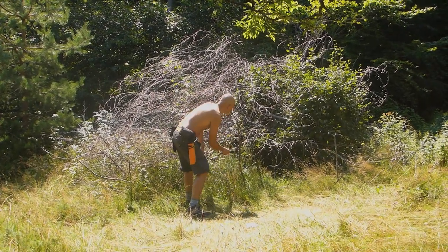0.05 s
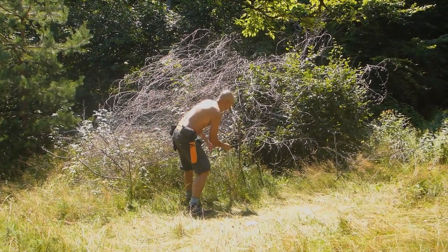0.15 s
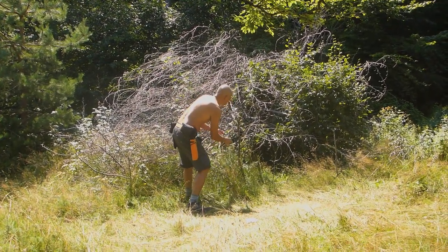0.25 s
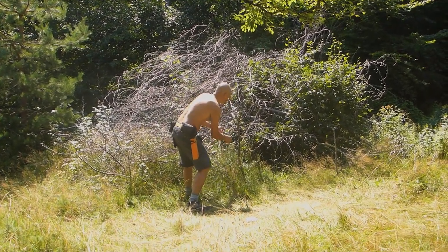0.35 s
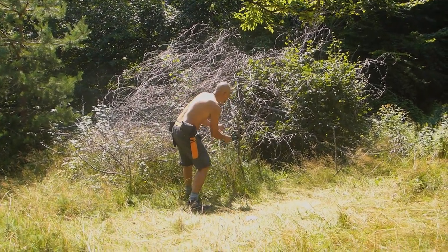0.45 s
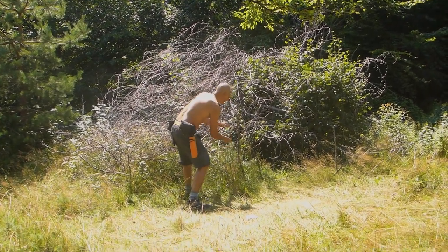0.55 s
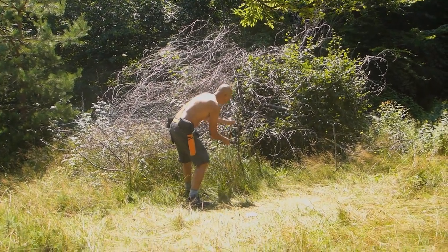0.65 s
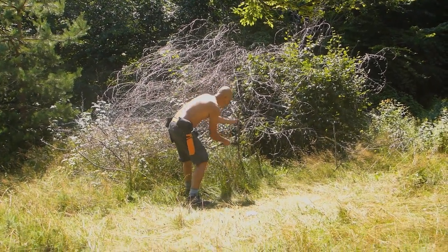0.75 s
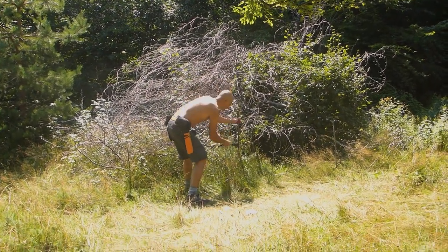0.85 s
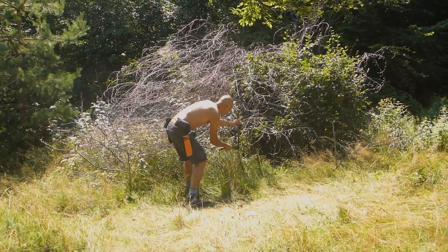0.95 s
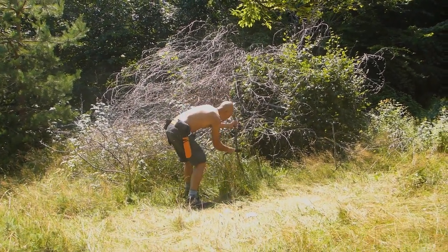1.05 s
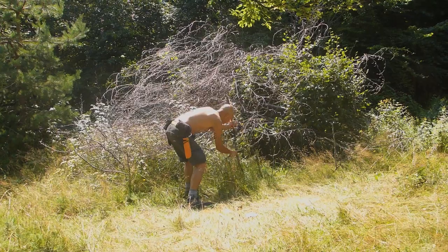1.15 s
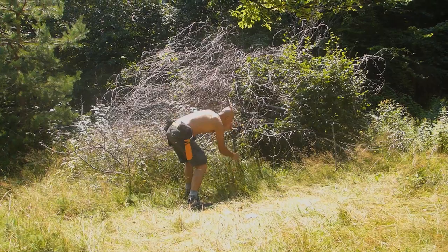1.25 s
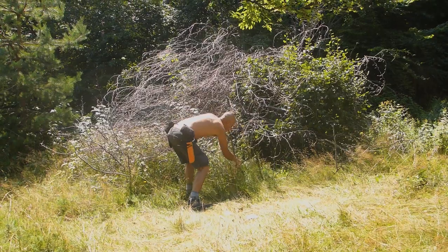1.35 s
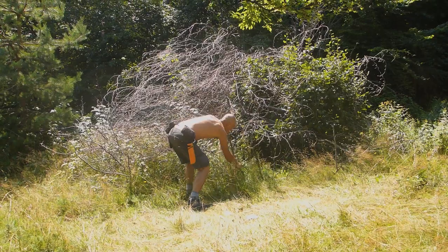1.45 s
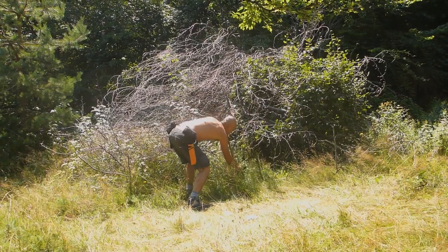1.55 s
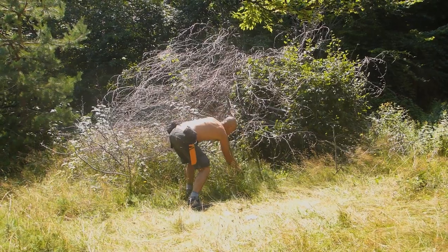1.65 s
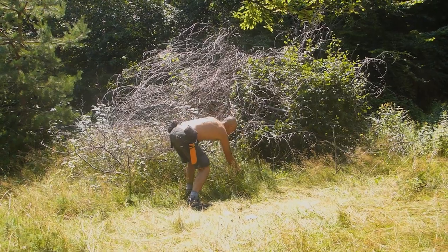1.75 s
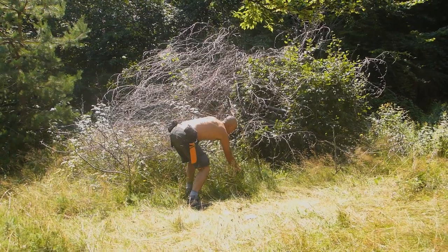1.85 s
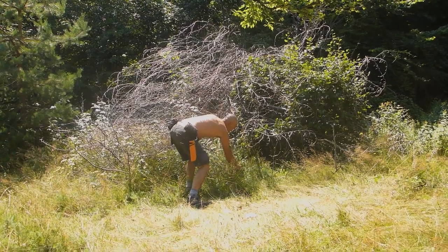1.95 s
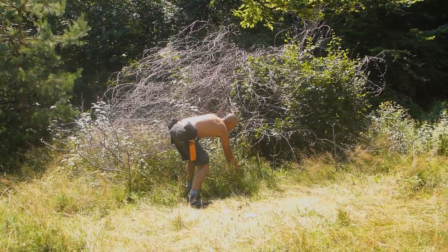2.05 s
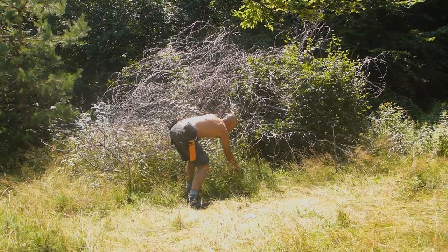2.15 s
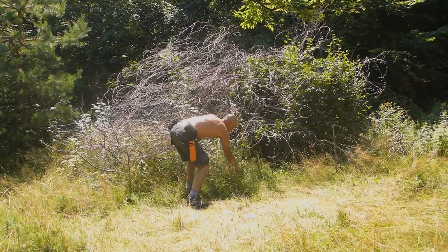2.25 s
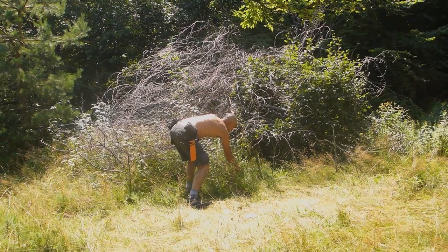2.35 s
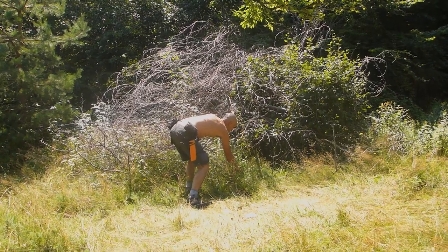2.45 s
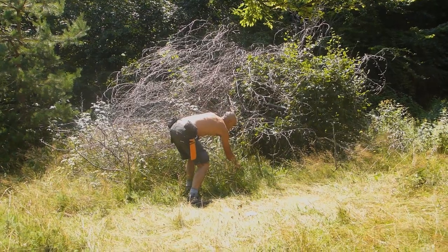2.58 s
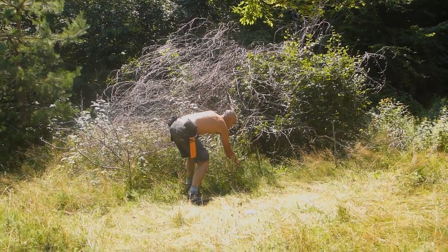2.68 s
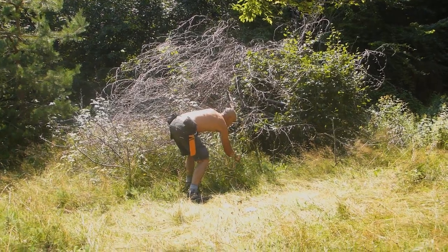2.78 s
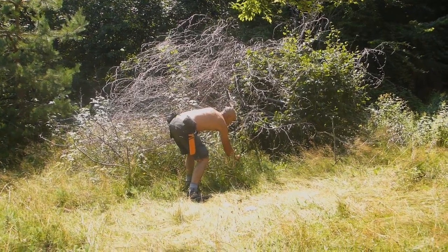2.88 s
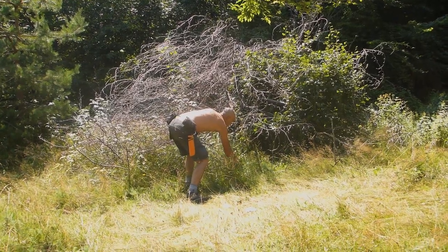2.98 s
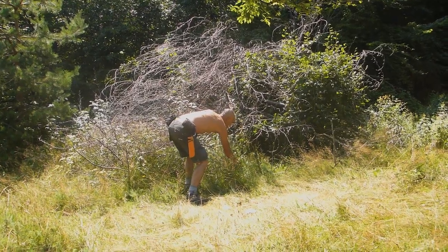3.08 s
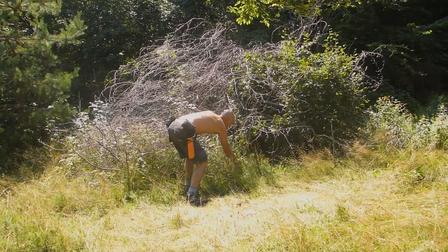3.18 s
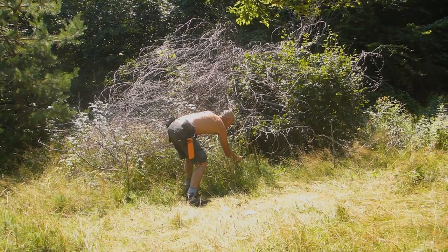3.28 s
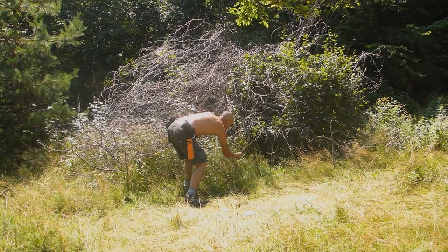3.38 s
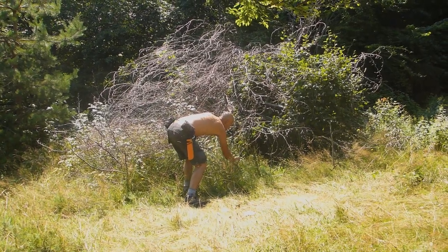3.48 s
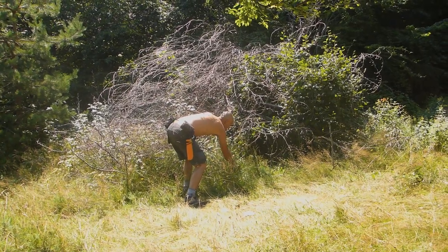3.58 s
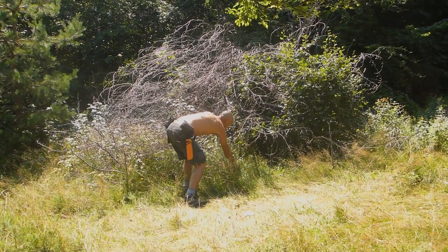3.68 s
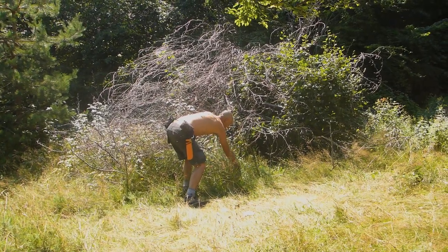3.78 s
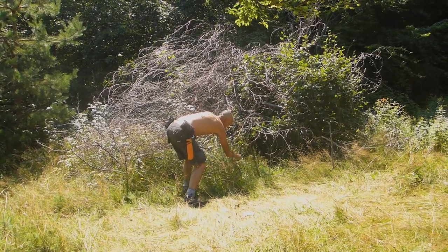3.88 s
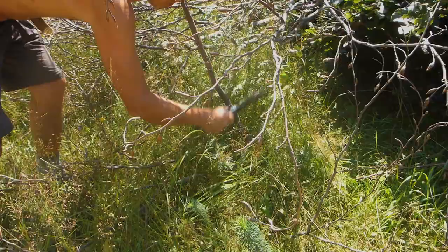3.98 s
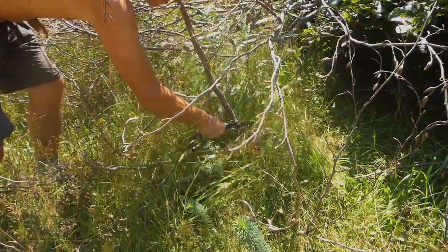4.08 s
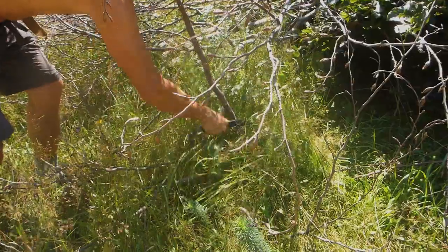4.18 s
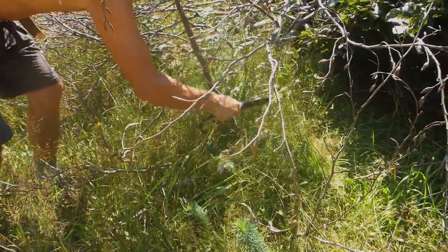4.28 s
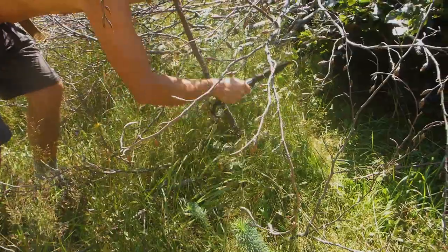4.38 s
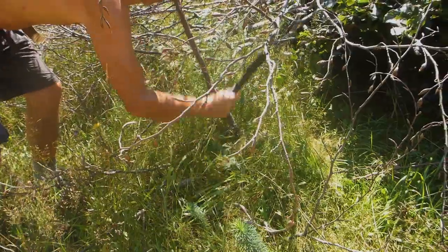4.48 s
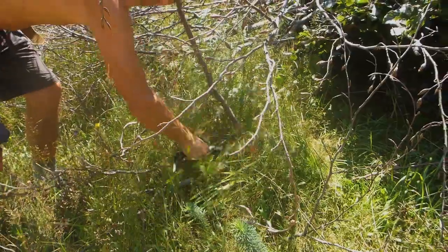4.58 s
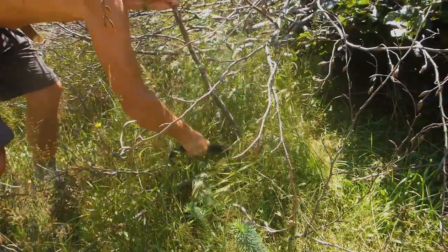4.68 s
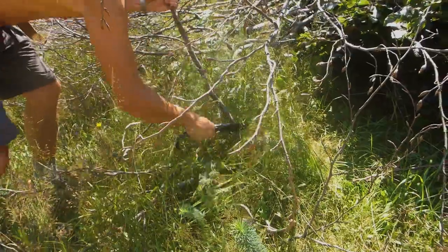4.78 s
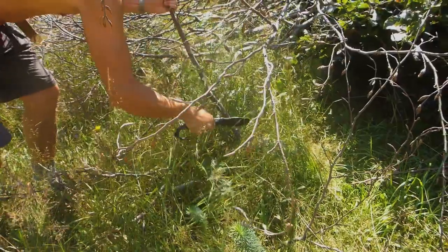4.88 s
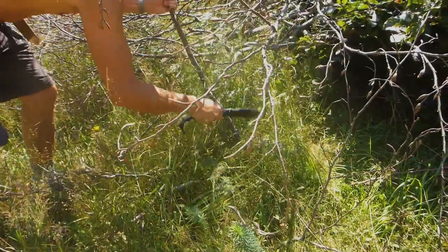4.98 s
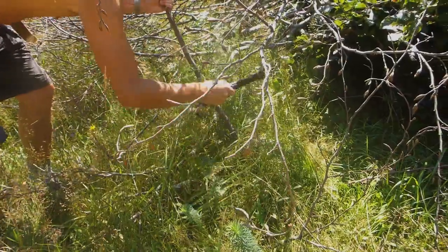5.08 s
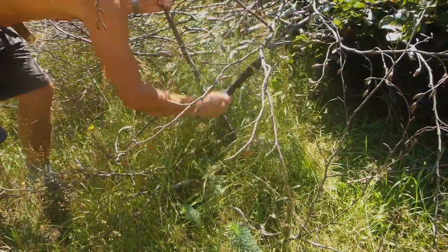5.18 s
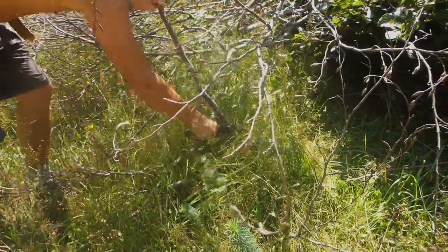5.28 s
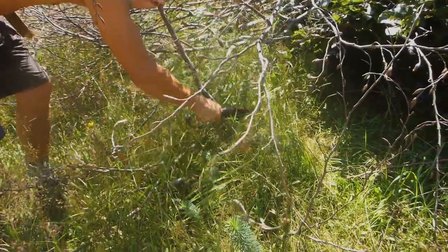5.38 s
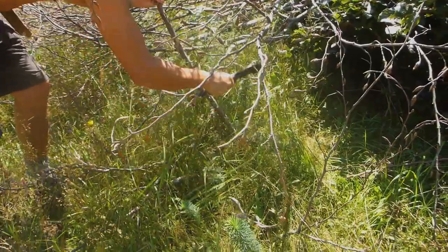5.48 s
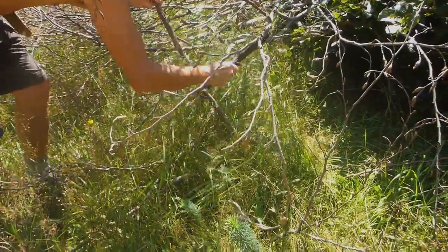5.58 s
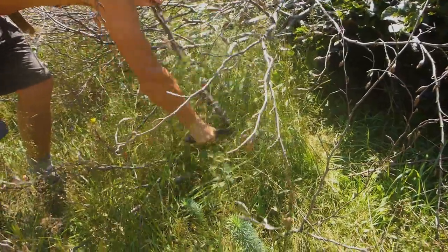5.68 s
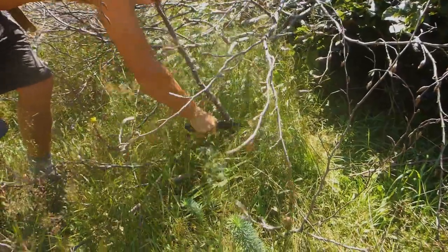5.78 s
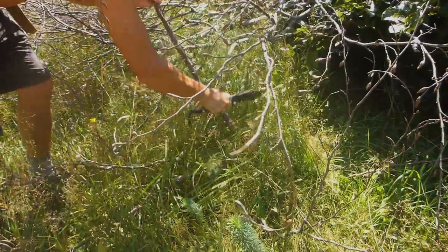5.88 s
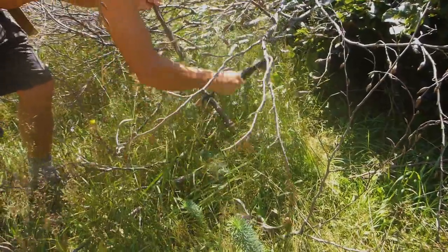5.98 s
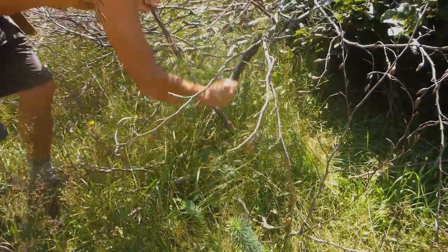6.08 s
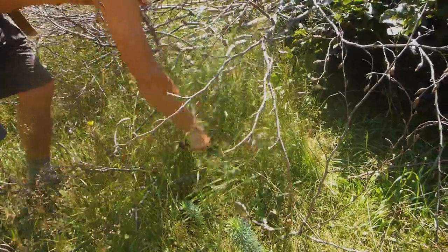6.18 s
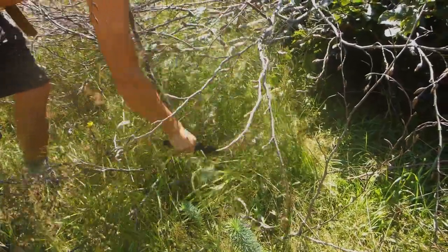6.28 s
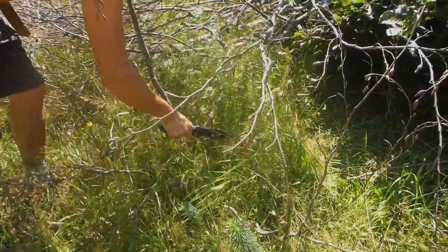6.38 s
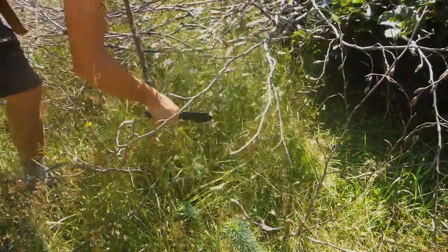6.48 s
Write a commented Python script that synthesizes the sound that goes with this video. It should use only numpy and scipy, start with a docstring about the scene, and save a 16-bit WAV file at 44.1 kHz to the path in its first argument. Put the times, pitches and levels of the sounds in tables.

```python
"""A machete chops into a dry branch in a meadow: seven blows, each a crack with splintering and a low thud.
Cracks are noise bites and dying runs of fibre snaps ringing the wood; bushes and forest edge scatter them.
A stream (shaped stereo noise) hisses nearby, dry grass ticks, and a grasshopper rasps in pulsed treble noise.
The first two blows are heard from afar; at 4 s the listening point jumps close to the branch, where the
stream is softer."""
import sys
import numpy as np
from scipy import signal
from scipy.fft import rfft, irfft
from scipy.io import wavfile
from scipy.ndimage import uniform_filter1d

SR = 44100
rng = np.random.default_rng(int(sys.argv[2]) if len(sys.argv) > 2 else 0)


def pcm_store(signal):
    """Save signal as 16-bit PCM."""
    levels = np.round(np.clip(np.atleast_2d(signal), -1, 1) * 32767)
    wavfile.write(sys.argv[1], SR, levels.astype(np.int16).T)


N = 288409  # samples

# blows of the blade: start_s, level_db, pitch_factor, body_db, knock_db, edge_db, splinter_db, ring_hz, mute_hz,
# thud_hz, thud_db, grass_db (shaken grass, before its rise and settling)
BLOWS = [ (2.9563, -1.5, 0.87, 4, 11, -10, 6, 1910, 846, 167.5, -38.5, -70),
         (3.5585, 10.5, 0.85, 0, 0, -19, -0.5, 2170, 1600, 167, -41.5, -68),
         (4.0438, 24, 0.98, 10.5, 7.5, -9.5, -5, 2570, 1870, 169, -31.5, -67),
         (4.5878, 25, 0.983, -6.5, 2.5, -4, -5.5, 3470, 3070, 180, -38, -53.5),
         (5.2739, 24, 1.03, -4, 0.5, -1.5, -12.5, 3560, 1490, 186, -37.5, -59),
         (5.7235, 18.5, 1.07, 8, -1.5, 8.5, -12, 3130, 4230, 165, -37.5, -70),
         (6.1919, 17, 1.02, 5.5, 6, -8, 0, 712, 3950, 144, -39, -49)]


def amp(db):
    """Decibels to gain."""
    return 10 ** (np.asarray(db) / 20)


def evened(x):
    """Scales to rms 1."""
    return x / np.sqrt(np.mean(x ** 2) + 1e-20)


def read(points, hz, axis=1):
    """One column of a table, interpolated over log frequency."""
    table = np.transpose(points)
    return np.interp(np.log(hz + 1), np.log(table[0] + 1), table[axis])


def level(points):
    """A (time_s, level_db) curve as a gain for every sample."""
    return amp(np.interp(np.arange(N) / SR, *np.transpose(points)))


def add(mix, start_s, sound):
    """Mixes a sound in at start_s."""
    part = mix[max(round(start_s * SR), 0):][:len(sound)]
    part += sound[:len(part)]


def causal(gain):
    """Minimum-phase spectrum of this gain: a ring that starts at once."""
    log_gain = np.log(np.maximum(gain, 1e-5))
    mirrored = np.r_[log_gain, log_gain[-2:0:-1]]
    return np.exp(np.conj(signal.hilbert(mirrored)))[:len(gain)]


def hiss(spectrum, patchy_db):
    """Stereo noise at rms 1 with short random patches, most alike between the ears in the low mids."""
    # between the ears: freq_hz, coherence, left_minus_right_db, phase_rad
    width = [(50, 0.41, 5, 0), (132, 0.91, 1.5, 0.03), (300, 1, 1.2, -0.2), (636, 0.55, 2.5, -0.49),
             (1410, 0.61, 4, -1.12), (3480, 0.75, -0.3, 0.063), (4100, 0.44, 2, 0), (7000, 0.56, 1.5, -.2),
             (15000, 0.19, 4.5, 0)]
    frames, hz = N // 256 + 5, np.fft.rfftfreq(1024, 1 / SR)
    a, b, c, d, patches = rng.standard_normal((5, frames, len(hz)))
    patches = uniform_filter1d(patches, size=7, axis=0)  # over time
    patches = evened(uniform_filter1d(patches, size=9, axis=1))  # over frequency
    coherence = np.clip(read(width, hz), -1, 1)
    left = a + 1j * b
    right = coherence * left + np.sqrt(1 - coherence ** 2) * (c + 1j * d)
    right = right * amp(-read(width, hz, axis=2)) * np.exp(-1j * read(width, hz, axis=3))
    z = np.array([left, right]) * amp(read(spectrum, hz) + patchy_db * patches)
    noise = signal.istft(z.transpose(0, 2, 1), nperseg=1024, noverlap=768)[1]
    return evened(noise[:, :N])


def stream(move_s=4.0, fade_s=0.0098, open_db=-40.5):
    """Rushing water as broadband noise: steady across the open meadow, softer and drifting behind the bush."""
    # water spectra, relative: freq_hz, density_db
    open_spectrum = [(18, -65), (30, -9), (70, -46), (147, -5.5), (219, -1.5), (451, -4), (720, -1),
                     (889, -5), (1420, -4.5), (1560, -4), (2610, -9.5), (3610, -14.5), (5130, -22),
                     (5900, -33), (8000, -40), (10400, -49), (17600, -120)]
    sheltered_spectrum = [(18, -41), (30, -32), (101, -11.5), (134, -3.5), (270, -2.5), (296, -2.5),
                          (507, -5.5), (612, -7), (829, -7), (1520, -9.5), (2260, -12), (4900, -21),
                          (5380, -28.5), (8000, -37.5), (10400, -53), (17600, -120)]
    # level behind the bush: time_s, level_db
    sheltered_db = [(4.0, -44), (4.11, -46.5), (6.05, -49.5), (6.54, -47)]
    close = np.clip((np.arange(N) / SR - move_s) / fade_s, 0, 1)
    far_water = amp(open_db) * hiss(open_spectrum, patchy_db=1.08)
    near_water = level(sheltered_db) * hiss(sheltered_spectrum, patchy_db=1.37)
    return (1 - close) * far_water + close * near_water


def shaking(rise_s=0.018, settle_s=0.16):
    """Grass motion as a gain: a slowly varying stir, plus a quick rise and slow settling after each blow."""
    # faint stir of dry grass that slowly rises and falls: time_s, level_db
    stir_db = [(0, -67.5), (2.2, -71), (3.9, -61.5), (4.2, -65.5), (6.54, -67.5)]
    t, power = np.arange(N) / SR, level(stir_db) ** 2
    for start_s, *_, grass_db in BLOWS:
        age_s = np.maximum(t - start_s, 0)
        shake = amp(grass_db) * (1 - np.exp(-age_s / rise_s)) * np.exp(-age_s / settle_s)
        power = power + shake ** 2
    return np.sqrt(power)


def rustle(ticks_per_s=2500, spread_db=1.5):
    """Dry stalks and twigs brush each other: many tiny ticks, a few of them larger."""
    # tick colour: freq_hz, gain_db
    grass = [(1000, -35), (4000, 9.5), (6500, -2.5), (8000, -7), (9000, -7), (9800, 8), (11000, 0),
             (13000, -8), (16000, -28)]
    hz = np.fft.rfftfreq(N, 1 / SR)
    sizes = amp(spread_db * np.minimum(rng.exponential(1, (3, N)), 4))
    sizes = sizes * rng.choice([-1, 1], (3, N))
    left, right, centre = sizes * (rng.random((3, N)) < ticks_per_s / SR)
    ticks = irfft(rfft([left + centre, right + centre]) * causal(amp(read(grass, hz))), N)
    return shaking() * evened(ticks)


def grasshopper(sharpness=2.9, between=0.35, uneven_db=1.3, crescendo_db_per_s=0.2):
    """Each leg stroke is an uneven swell of high rasp, about ten a second; a phrase slowly grows."""
    # phrases: first_stroke_s, last_stroke_s, strokes_per_s, level_db (at the first stroke)
    phrases = [(.055, .27, 9.4, -66), (.725, 1.035, 9.3, -70), (1.169, 3.925, 9.82, -64.5),
               (4.414, 5.66, 12.4, -67)]
    # rasp spectrum, relative: freq_hz, density_db
    rasp = [(5000, -63), (9050, -41), (9450, 7), (10200, 3.5), (11200, -5), (12700, -11), (14500, -36),
            (16000, -34)]
    t, strokes = np.arange(N) / SR, np.zeros(N)
    for first_s, last_s, rate, db in phrases:
        turns = (t - first_s) * rate  # whole numbers at stroke peaks
        singing = (turns > -.5) & (turns < round((last_s - first_s) * rate) + .5)
        swell = between + (1 - between) * abs(np.cos(np.pi * turns)) ** sharpness
        strokes += amp(db + crescendo_db_per_s * (t - first_s)) * singing * swell
    pressure_db = uneven_db * evened(uniform_filter1d(rng.standard_normal(N), size=1500))
    return strokes * amp(pressure_db) * hiss(rasp, patchy_db=1.0)


def resonance(hz, centre_hz, width_hz):
    """Power gain of one mode, 1 at its centre."""
    return 1 / (1 + ((hz ** 2 - centre_hz ** 2) / (width_hz * hz + 1)) ** 2)


def crack(db, pitch, body_db, knock_db, edge_db, fizz_db, splinter_db, splinter_s, ring_hz, ring_db, mute_hz,
          bite_s=0.000405, fibres_per_s=2600, ring_share=0.16, mute_db=-11, size=8192):
    """The blade bites, then fibres tear in a dying run of tiny snaps; both ring the wood."""
    # dry wood modes, before the pitch factor: centre_hz, width_hz, gain_db
    wood_modes = [(343, 230, -8), (738, 56, -4), (1090, 400, -6.5), (1480, 250, -4.5), (2280, 190, 1),
                  (2850, 640, -5), (3030, 475, -3), (3790, 170, -8), (4540, 530, -14), (7760, 1200, -43.5),
                  (9800, 1500, -35)]
    # trim by air, grass and microphone: freq_hz, gain_db
    trim = [(30, -24), (100, -9), (250, -4), (3500, -2), (5200, 2), (6300, -7), (8000, -2.5), (8900, -6),
            (10000, 3.5), (12500, -6), (16000, -18)]
    t, hz = np.arange(size) / SR, np.fft.rfftfreq(size, 1 / SR)
    grit, snaps = rng.standard_normal((2, size))
    bite = rfft(grit * t / bite_s * np.exp(-t / bite_s))
    bite /= causal(abs(bite))  # spread over a moment, yet equally strong at every pitch
    fibres = snaps * (rng.random(size) < fibres_per_s / SR) * np.exp(-t / splinter_s) * (t > 2 * bite_s)
    tear = rfft(fibres) / (np.linalg.norm(fibres) + 1e-9)
    # the modes add in power
    wood = np.sqrt(sum(amp(2 * d) * resonance(hz, f * pitch, w) for f, w, d in wood_modes))
    # where and how hard the blade lands weights body, knock, edge and fizz: freq_hz, gain_db
    colour = [(60, 0), (330, body_db), (580, 0), (1050, knock_db), (1400, knock_db), (2300, 0),
              (3500, 0), (5000, edge_db), (10000, fizz_db)]
    # each crack has one pitch band that rings out and one that is weak
    bands_db = ring_db * resonance(hz, ring_hz, ring_share * ring_hz)
    bands_db = bands_db + mute_db * resonance(hz, mute_hz, ring_share * mute_hz)
    ring = causal(wood * amp(read(colour, hz) + bands_db + read(trim, hz)))
    return amp(db) * irfft(ring * (bite + amp(splinter_db) * tear))


def thud(hz, db, swell_s=.012):
    """Branch and ground swing: a low sine that peaks after swell_s and dies."""
    t = np.arange(SR // 4) / SR
    envelope = t / swell_s * np.exp(1 - t / swell_s)
    return amp(db) * envelope * np.sin(2 * np.pi * hz * t)


def chops():
    """Each blow cracks the wood and sets branch and ground swinging; fibres and twigs snap around the blows."""
    # snaps: start_s, level_db, weight_db (body and knock), edge_db, fizz_db, splinter_s, ring_hz
    snaps = [ (4.0497, 7, 17, 6, -7, .0025, 1170), (4.0747, 0, -4, -13, -8, .004, 2290),
             (4.5842, -2.5, 5, -6, -1, .002, 3600), (4.6014, 4.5, 3, 9, 9.5, 0.0027, 4760),
             (4.6292, -8.5, -9, 12, 2, .002, 2700), (4.7670, -6.5, 2, 2.5, 4.5, 0.0044, 1450),
             (6.1890, 12, 2.5, 2, -8, .0017, 3120), (6.2300, -4.5, 1, 0, -2, 0.035, 3300),
             (6.354, -18, 6, 4, 16, .0054, 3400), (6.3832, -23, 4, 11, 21, 0.0055, 3400)]
    wood, low = np.zeros((2, N))
    for (start_s, db, pitch, body_db, knock_db, edge_db, splinter_db, ring_hz, mute_hz,
         thud_hz, thud_db, _) in BLOWS:
        ring_db = 3.5 + 0.2946 * db  # a harder blow rings more
        fizz_db = -4 + 0.26 * edge_db  # a sharper edge fizzes more
        add(wood, start_s, crack(db, pitch, body_db, knock_db, edge_db, fizz_db, splinter_db, 0.0035,
                                 ring_hz, ring_db, mute_hz))
        add(low, start_s + 0.0023, thud(thud_hz, thud_db))
    for start_s, db, weight_db, edge_db, fizz_db, splinter_s, ring_hz in snaps:
        # deep dip at 580 Hz: a markedly hollow snap
        add(wood, start_s, crack(db, 0.94, weight_db, weight_db, edge_db, fizz_db, splinter_db=1,
                                 splinter_s=splinter_s, ring_hz=ring_hz, ring_db=6.5,
                                 mute_hz=580, mute_db=-14))
    return wood, low


def second_port(x, skew_s=.000007):
    """Two microphone ports hear a crack with slightly different timing and different colour."""
    hz = np.fft.rfftfreq(N, 1 / SR)
    # freq_hz, left_minus_right_db
    lean = [(100, 8), (300, 2), (700, 4.5), (1300, -0.5), (1800, -4.0), (2700, -4.5), (3500, 2.5),
            (4300, -3), (5200, 10.5), (6500, -17), (8000, 7), (12000, -4)]
    tilt = amp(read(lean, hz) / 2) * np.exp(-1j * np.pi * hz * skew_s)
    return irfft(rfft(x) * np.array([tilt, 1 / tilt]), N)


def scatter(x, bands, delay_s, spread):
    """Many small reflections, each band dying at its own speed; the treble differs between the ears."""
    hz, t, z = signal.stft(rng.standard_normal((2, SR // 2)), SR, nperseg=128)
    t60_s = np.maximum(read(bands, hz, axis=2), .01)[:, None]
    decay = np.exp(-np.log(1000) * t / t60_s)
    unit_energy = np.sqrt(2 * np.log(1000) / (t60_s * SR))
    z = z * amp(read(bands, hz))[:, None] * decay * unit_energy
    z[1] *= (spread * hz / (hz + 450))[:, None]
    mid, side = signal.istft(z, SR, nperseg=128)[1]
    taps = np.pad([mid + side, mid - side], ((0, 0), (round(delay_s * SR), 0)))
    return signal.fftconvolve(x[None], taps, axes=1)[:, :N]


def scene():
    """Chops and their echoes over stream, grass and grasshopper."""
    # scatter from bushes and from the forest edge: freq_hz, gain_db, t60_s
    bushes = [(150, 9.5, 0.086), (400, -4, 0.1), (1240, -1, 0.057), (3000, -14.5, 0.071),
              (5000, -11, 0.064), (10000, -8.5, 0.089), (16000, -21, .06)]
    forest = [(150, -29, .5), (1000, -44, .45), (2500, -35, .5), (3400, -29.5, 0.5), (4200, -23, 0.55),
              (5200, -29.5, 0.43), (10000, -26, .25), (16000, -34, .2)]
    wood, low = chops()
    echoes = scatter(wood, bushes, delay_s=0.001988, spread=0.69)
    echoes = echoes + scatter(wood, forest, delay_s=.035, spread=0.54)
    return second_port(wood) + low + echoes + stream() + rustle() + grasshopper()


def record(dry, edge_hz=16100):
    """Hard clipping at 0.95 of full scale, then a linear-phase low-pass."""
    clipped = np.clip(dry, -.95, .95)
    low_pass = signal.firwin(255, edge_hz, window=("kaiser", 9), fs=SR)
    return signal.oaconvolve(clipped, low_pass[None], "same")


dry = scene()
out = record(dry)
pcm_store(out)
```